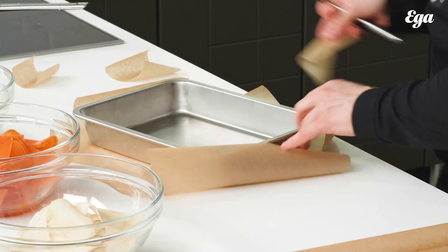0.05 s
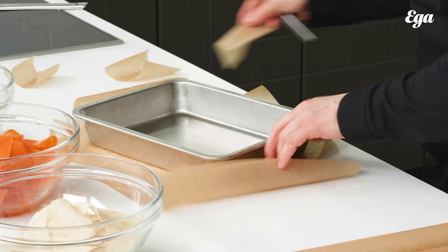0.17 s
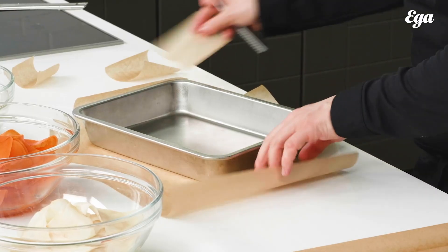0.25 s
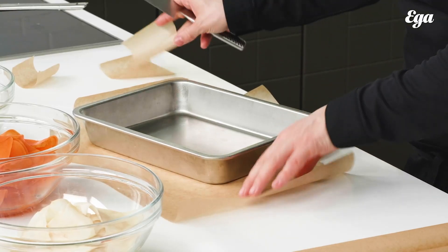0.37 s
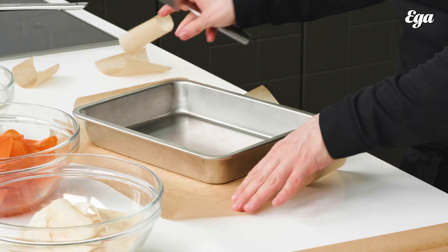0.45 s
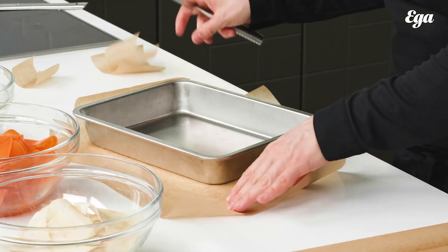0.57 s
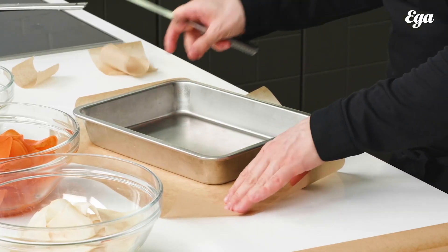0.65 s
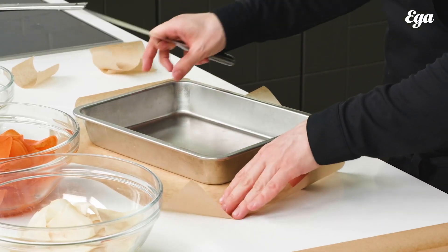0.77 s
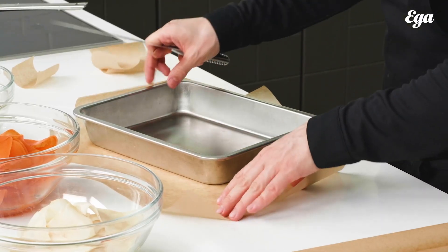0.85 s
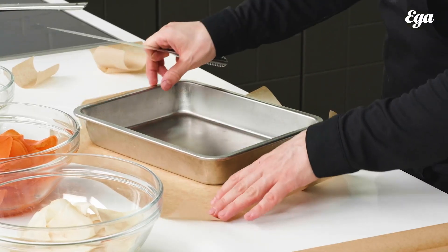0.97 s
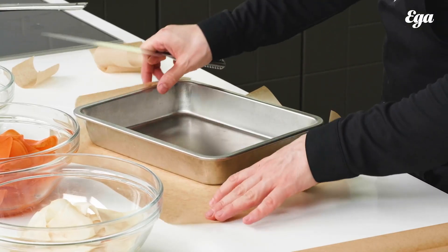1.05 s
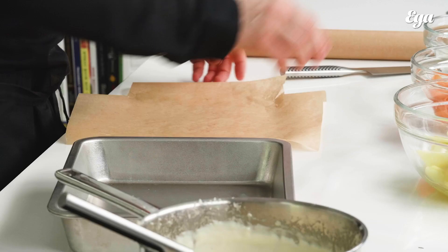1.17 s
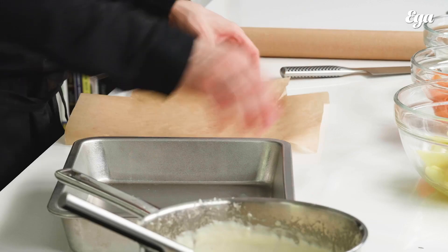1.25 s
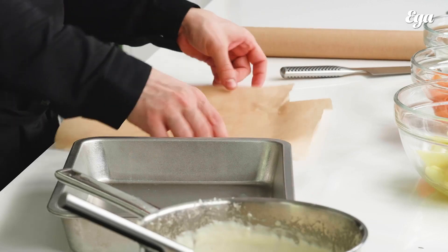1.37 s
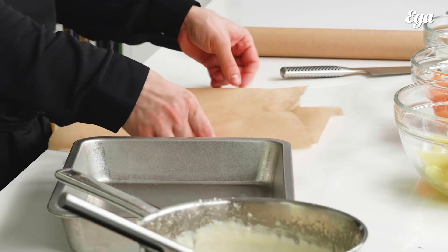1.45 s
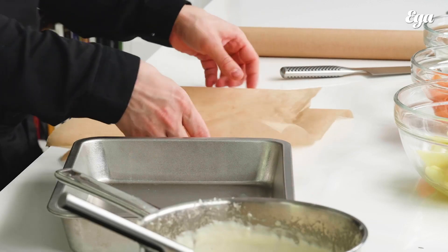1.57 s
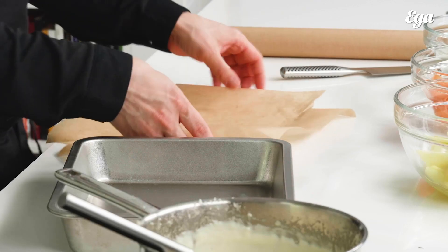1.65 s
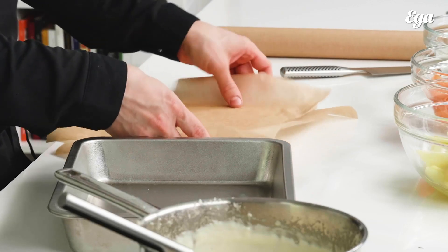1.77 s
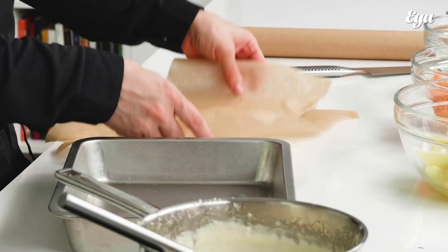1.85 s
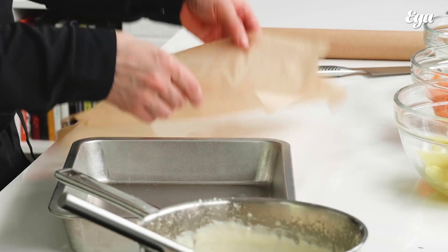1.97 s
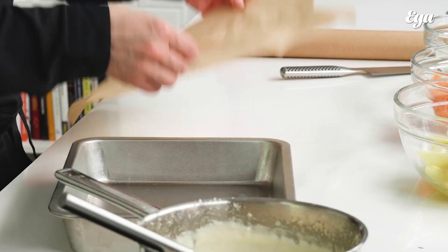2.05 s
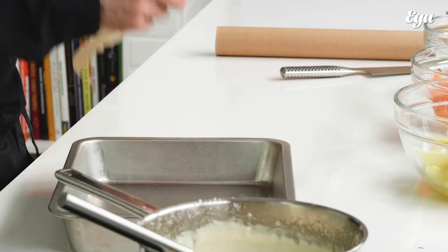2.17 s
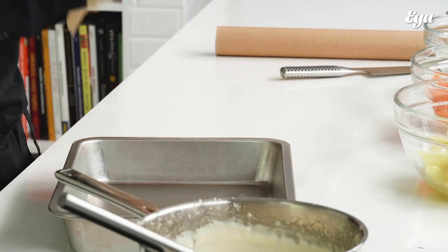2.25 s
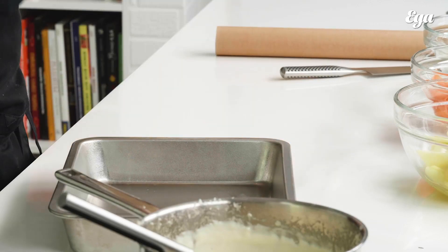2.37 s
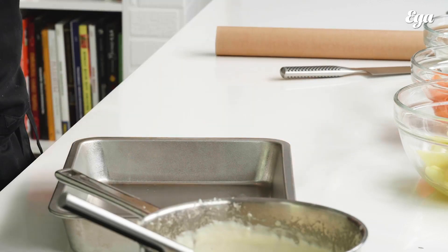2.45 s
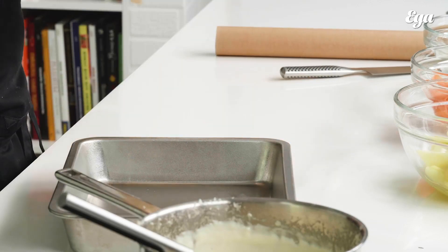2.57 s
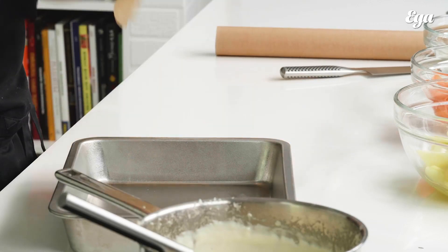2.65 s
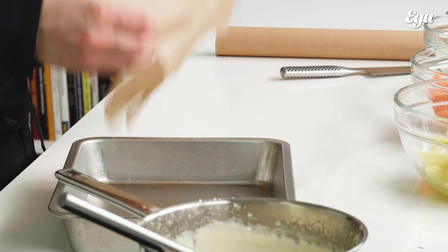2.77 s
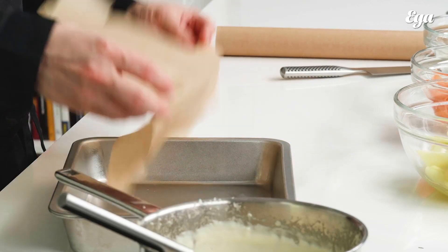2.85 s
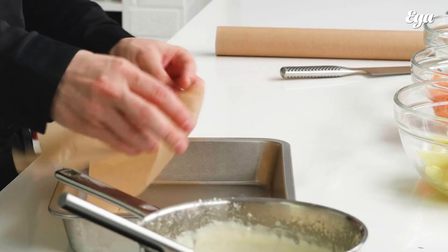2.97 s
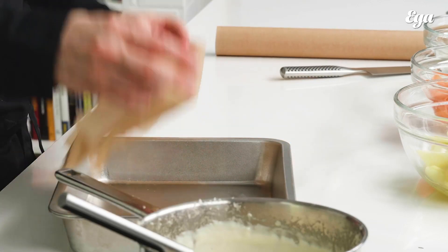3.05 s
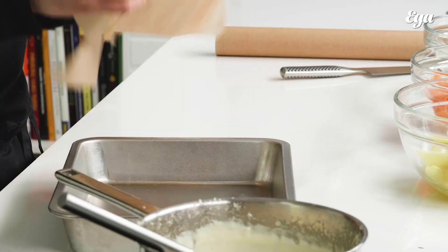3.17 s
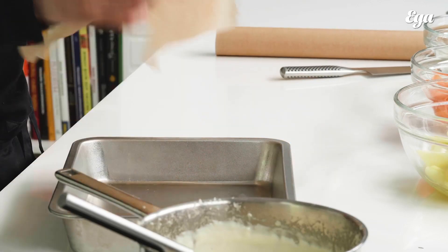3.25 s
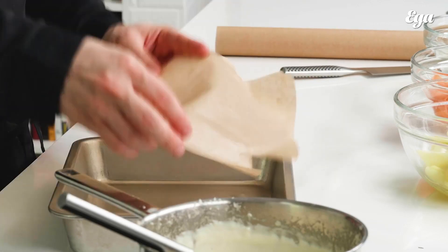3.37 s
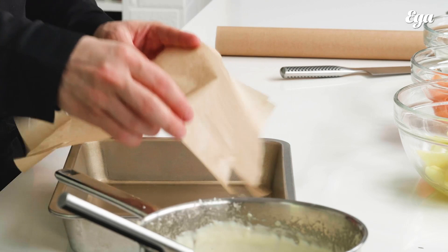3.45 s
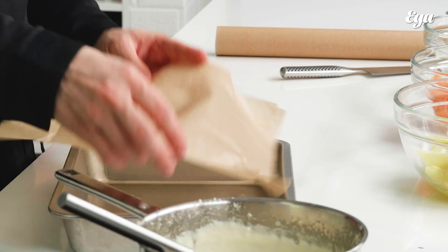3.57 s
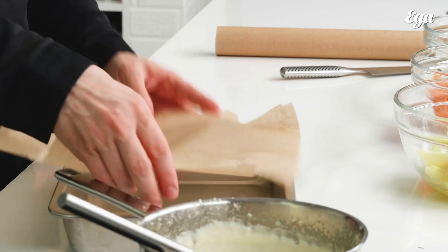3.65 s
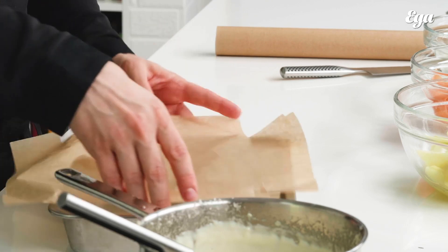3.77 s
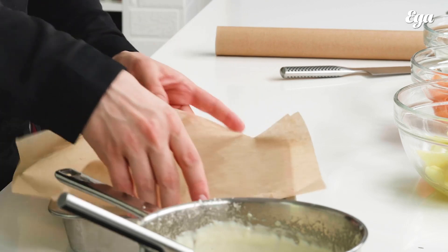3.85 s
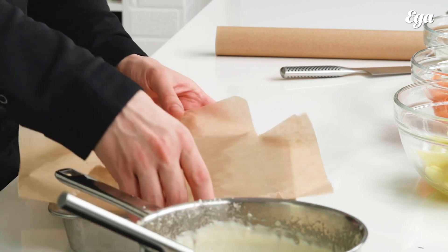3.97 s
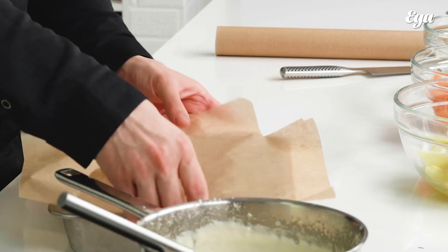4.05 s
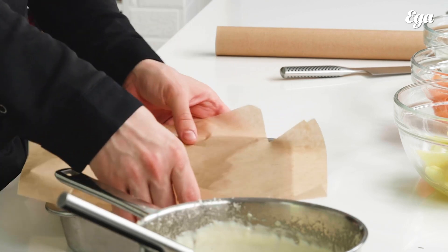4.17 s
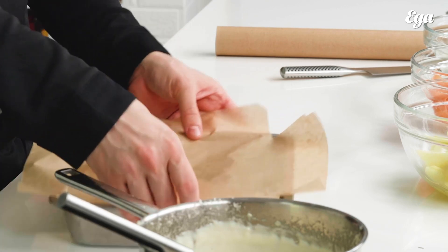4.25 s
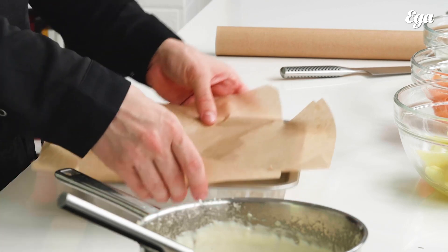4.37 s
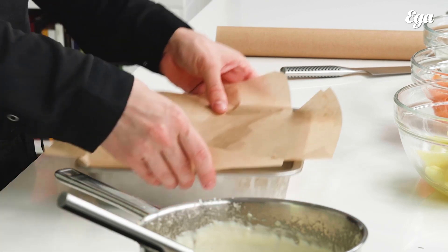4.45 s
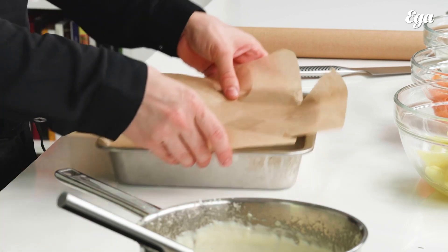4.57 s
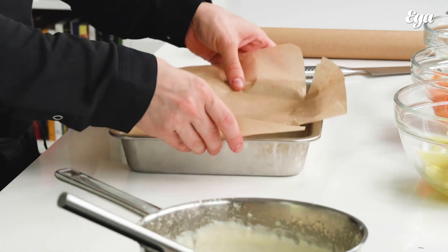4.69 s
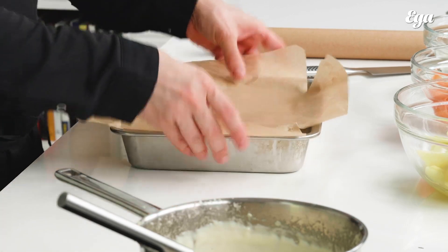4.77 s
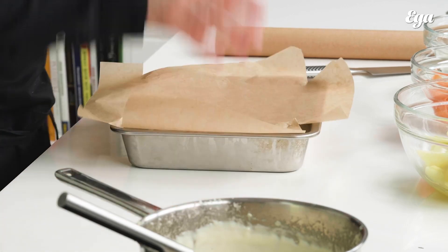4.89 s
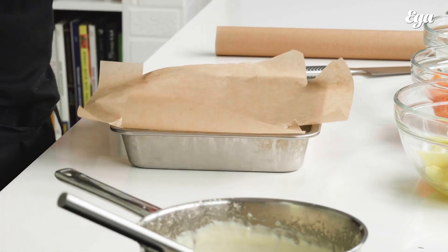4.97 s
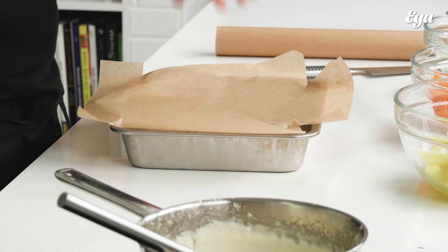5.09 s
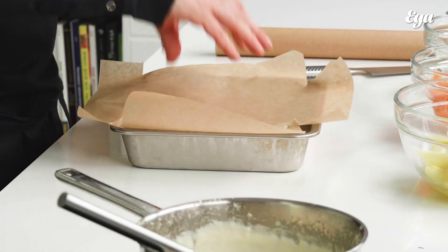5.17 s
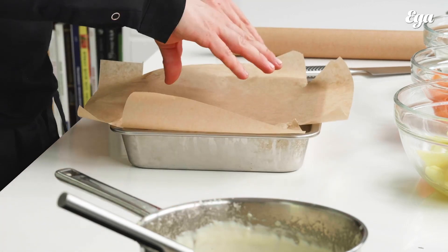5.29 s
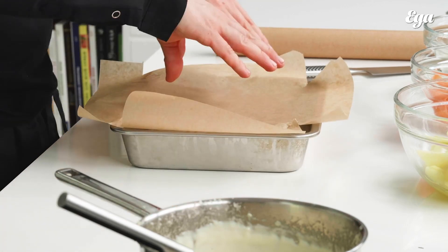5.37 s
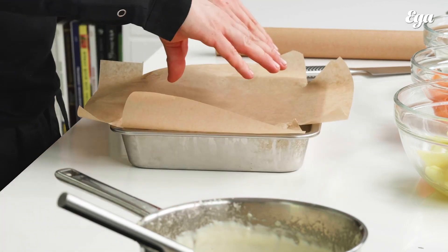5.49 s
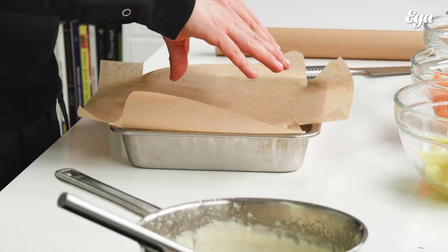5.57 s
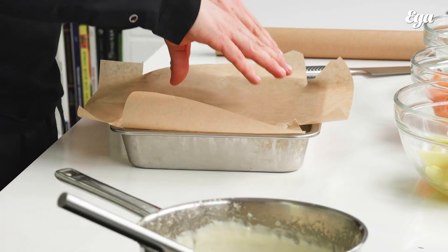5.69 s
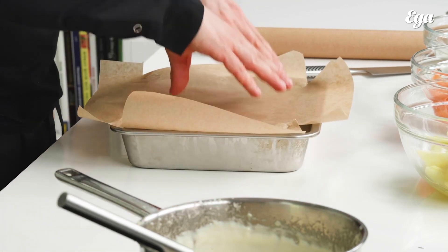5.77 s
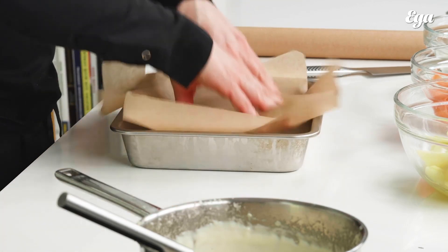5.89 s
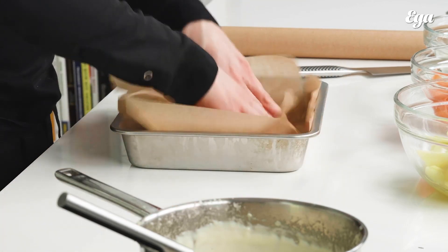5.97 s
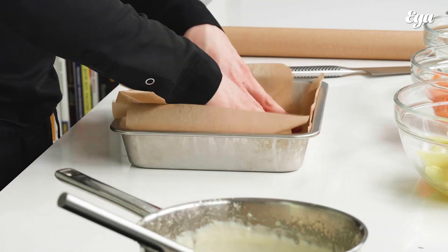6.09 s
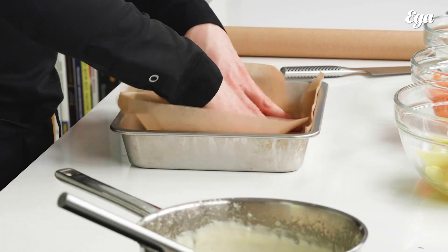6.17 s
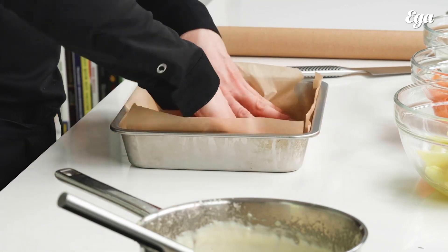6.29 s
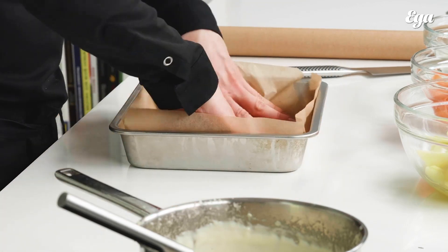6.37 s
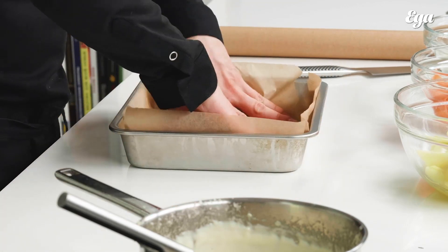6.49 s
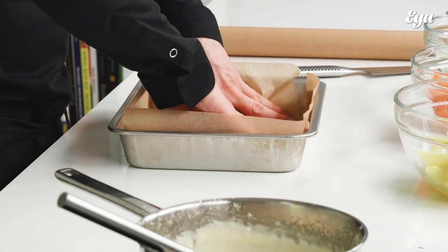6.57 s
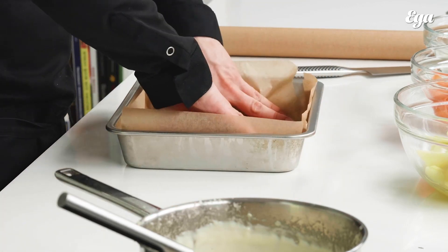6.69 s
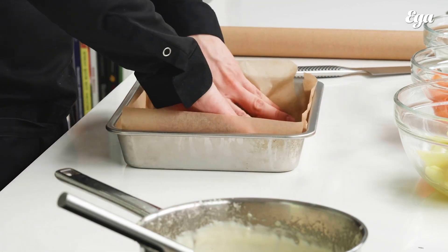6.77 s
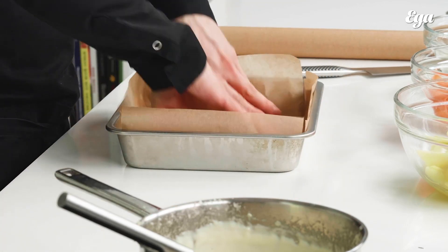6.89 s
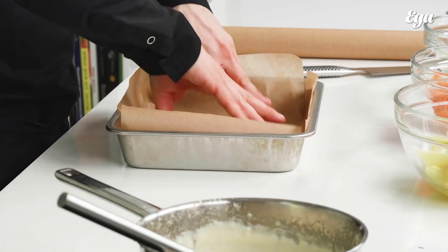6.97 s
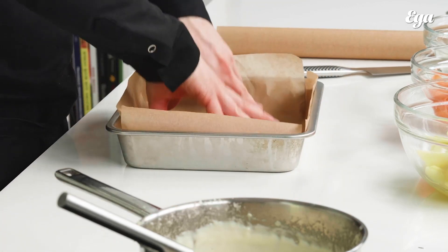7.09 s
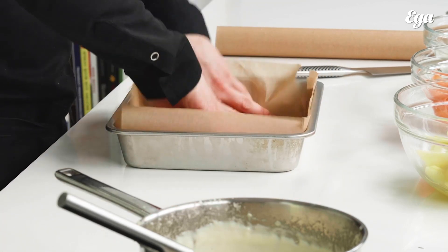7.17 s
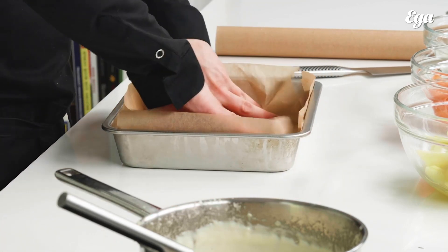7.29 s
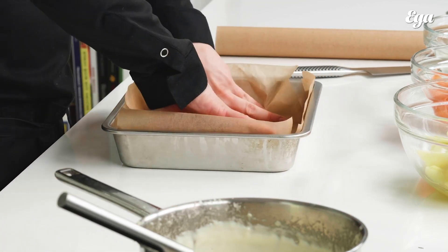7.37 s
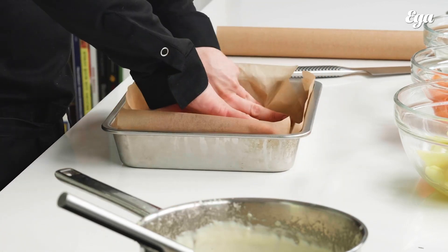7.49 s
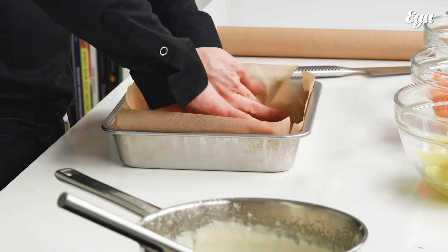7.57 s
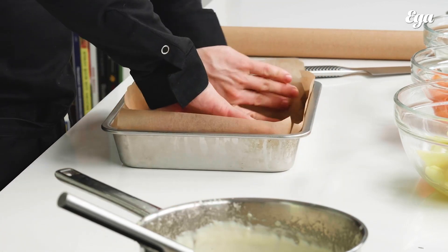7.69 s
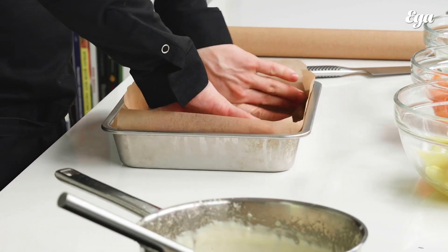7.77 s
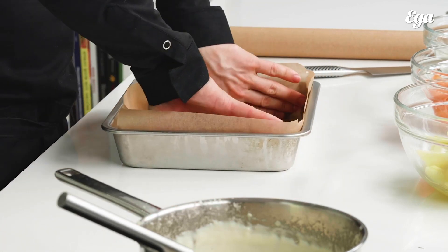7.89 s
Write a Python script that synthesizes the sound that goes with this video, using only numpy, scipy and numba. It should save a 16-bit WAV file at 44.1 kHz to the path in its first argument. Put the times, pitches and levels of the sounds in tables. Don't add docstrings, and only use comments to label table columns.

```python
import sys
import numpy as np
from scipy import signal
from scipy.fft import rfft, irfft, dct
from scipy.io import wavfile
from scipy.ndimage import uniform_filter1d
from numba import njit

SR = 44100
rng = np.random.default_rng(int(sys.argv[2]) if len(sys.argv) > 2 else 0)


def to_wav(s):
    ch = np.atleast_2d(s).T
    pcm = np.round(np.clip(ch, -1, 1) * 32767)
    wavfile.write(sys.argv[1], SR, pcm.astype(np.int16))


def makeup_ratio(level_db):
    decades = np.asarray(level_db, float) / 20
    return 10 ** decades


N = 349713


@njit
def svf(x, hz, width):
    y, b, l = np.empty(len(x)), 0., 0.
    g, k = np.tan(np.pi * hz / SR), width / hz
    for i in range(len(x)):
        v = (b + g * (x[i] - l)) / (1 + g * (g + k))
        b, l, y[i] = 2 * v - b, l + 2 * g * v, k * v
    return y


def unit(x):
    return x / np.sqrt(np.mean(x ** 2))


def shade(spectrum, hz):
    f, db = np.transpose(spectrum)
    return np.interp(np.log(hz), np.log(f), db)


def curves(table):
    s, *columns = np.transpose(table)
    return [np.interp(np.arange(N) / SR, s, c) for c in columns]


def peak_db(s, db, swell_s, fade_s, span_db):
    late_s = np.arange(N) / SR - s
    return db - span_db * np.maximum(-late_s / max(swell_s, .002), late_s / max(fade_s, .002))


def buckles(rate, spread_db):
    when, sign, size = rng.random(N), rng.standard_normal(N), rng.exponential(size=N)
    gain = makeup_ratio(np.minimum(spread_db * size, 26))
    return unit((when < rate / SR) * sign * gain)


def swarms(rate, spread_db, fade_s, calm):
    fall = np.exp(-1 / (fade_s * SR))
    power = signal.filtfilt([1], [1, -fall], buckles(rate, spread_db) ** 2, padlen=0)
    return calm + (1 - calm) * power / power.mean()


def handling():
    # t/s, effort/dB, crispness/dB
    steady = [(0.0, -64, -21), (0.35, -55.5, -5.5), (1.0, -73.5, -2.5), (1.11, -66, -9.5), (1.4, -72.5, -5),
              (1.72, -63.5, -6.5), (1.87, -44.5, -5), (2.37, -49, -11.5), (2.6, -44.5, -9),
              (3.08, -46.5, -8.5), (3.34, -44, -15), (3.6, -47, -9), (4.08, -65.5, -15), (4.14, -44, -9),
              (4.56, -51.5, -14), (5.02, -65.5, -22), (5.45, -87.5, -6.5), (5.9, -105, -4.5)]
    # start/s, peak/s, effort/dB, fade per swell/s, crispness/dB
    gestures = [(-0.01, 0.0, -44, 0.11, -7), (0.098, 0.262, -46.5, .04, -14),
                (0.31, 0.328, -41, 0.019, -4.5), (1.396, 1.438, -49, 0.39, -4),
                (2.36, 2.42, -36, 0.22, -3.5), (2.39, 2.506, -29.5, 0.048, -6),
                (3.073, 3.106, -37, 0.5, -5.5), (3.322, 3.461, -26.5, 0.035, -4),
                (3.678, 3.708, -38.5, 0.22, -10), (3.95, 4.022, -48.5, 0.11, -11.5),
                (4.534, 4.662, -39.5, .16, -9), (4.797, 4.859, -39.5, 0.12, -12),
                (5.926, 6.062, -25.5, 0.081, -4.5), (6.11, 6.325, -25, 0.15, -5),
                (6.364, 6.45, -39, 0.34, -5), (6.475, 6.565, -45.5, 0.1, 1),
                (6.74, 6.963, -48.5, 0.12, -7.5), (7.213, 7.268, -34.5, 0.22, -2),
                (7.63, 7.723, -38, 0.035, -9), (7.72, 7.744, -48.5, 1.7, -6)]
    swell_db = 21.5
    db, crisp_db = curves(steady)
    power = makeup_ratio(db) ** 2
    crisp = power * crisp_db
    for start_s, s, top_db, fade_s, edge_db in gestures:
        grip = makeup_ratio(peak_db(s, top_db, s - start_s, fade_s, swell_db)) ** 2
        grip = grip * (np.arange(N) >= start_s * SR)
        power = power + grip
        crisp = crisp + grip * edge_db
    db, crisp_db = 10 * np.log10(power), crisp / power
    belly_db = np.minimum(-8 - 0.0848 * (db + 44) + .05 * crisp_db, 1.5)
    return db, belly_db, crisp_db


def snaps():
    # t/s, peak/dB, fold ring f/Hz, edge/dB
    at_once = [(0.3177, -22.5, 2660, -34), (0.3295, -20, 3180, -26), (0.4396, -31, 4300, 1),
               (0.822, -42.5, 4300, 8.5), (1.506, -25, 3460, -6), (1.5335, -32, 3160, -17),
               (2.0558, -23, 3480, -11), (2.2593, -22.5, 1800, -2.5), (2.3805, -33, 1920, 1),
               (2.4024, -35, 2236, -10), (2.4578, -9.5, 2920, -21), (2.5322, -16, 2040, -2),
               (2.594, -36, 2750, 13.5), (2.8359, -23, 2600, -4), (3.1168, -25, 3360, 4.5),
               (3.1991, -17, 4250, -1), (4.119, -33, 4260, 1), (4.2094, -32.5, 5310, 9.5),
               (4.28, -29, 1660, -4), (4.3176, -23, 2320, 0), (4.9688, -29.5, 1970, -9.5),
               (6.2463, -12, 2410, -22), (6.6747, -20, 4780, 0), (6.7729, -22, 4100, -20),
               (6.8327, -30.5, 4680, -28), (6.9655, -29, 2710, -2), (7.1165, -38.5, 4080, -7),
               (7.452, -23.5, 2240, 3), (7.678, -22.5, 8200, 1), (7.8458, -21, 2400, -24)]
    # t/s, peak/dB, fold ring f/Hz, edge/dB
    crunching = [(0.4254, -32.5, 3930, -3.5), (1.5753, -21.5, 3440, -6), (1.82, -26.5, 1650, 1),
                 (1.8612, -25, 3830, -4), (2.1763, -28, 3430, -2), (2.4229, -15.5, 2220, 2),
                 (2.6162, -18.5, 3180, -2), (2.662, -24, 6200, 2), (2.7844, -20.5, 2130, -5),
                 (2.8727, -23.5, 4900, 1.5), (3.075, -28.5, 3060, -12), (3.2232, -19.5, 3790, -6),
                 (3.2931, -20, 2070, -4), (3.4508, -17, 2700, 3), (3.6142, -28.5, 2300, 2),
                 (3.7025, -27, 3200, -4), (4.6065, -26.5, 2860, 0), (4.6466, -19, 2420, 0),
                 (4.693, -25, 2040, -17.5), (4.8394, -26, 1620, -15.5), (6.1684, -28.5, 4740, -6),
                 (6.2818, -13, 2420, -19), (6.4188, -26, 2250, -17), (6.4536, -19, 3560, -5),
                 (6.5645, -27, 3140, -15), (6.8736, -33, 5100, -6), (7.012, -30, 4070, -3),
                 (7.3777, -26, 5800, 4), (7.7696, -27.5, 2960, -3), (7.8278, -27, 2390, -1)]
    # t/s, peak/dB, fold ring f/Hz, edge/dB
    running = [(0.703, -43, 2750, -12), (1.4276, -39, 3200, 3), (1.4439, -27.5, 3870, -14),
               (1.7838, -31, 3800, -3), (1.9751, -20.5, 4020, -10), (2.1397, -27, 3730, 0.5),
               (2.7521, -25, 2980, -6), (2.936, -19.5, 3180, -2.5), (2.9715, -20, 1960, -7.5),
               (3.246, -21, 2150, -4.5), (3.341, -36, 3610, -7), (3.3605, -20, 5300, -2.5),
               (3.3782, -20, 3860, -0.5), (3.518, -29, 2750, -14), (3.5334, -22.5, 5800, -3),
               (3.8786, -29, 5260, -12), (4.139, -28, 4190, 1.5), (4.3695, -24.5, 4280, -7),
               (5.9333, -22.5, 2610, -6), (5.953, -18, 1550, -12), (6.198, -18, 3130, -18),
               (6.5932, -19.5, 4600, 2.5), (6.757, -37.5, 3150, -9), (6.9206, -28, 3150, -6),
               (7.2494, -23.5, 6400, -18), (7.707, -18, 2250, -27)]
    power, ticks, rings = np.zeros((3, N)), np.zeros((3, N)), np.zeros(N)
    t = np.arange(2000) / SR
    for rows, ms in [(at_once, 2.3), (crunching, 4.7), (running, 10)]:
        age = t * 1000 / (0.49 * ms)
        run = (age * np.exp(1 - age)) ** 1.21
        for s, db, hz, edge_db in rows:
            i = int(s * SR)
            gain = makeup_ratio(db - 12.5 + np.array([[-16.0], [0], [edge_db]]))
            power[:, i:i + len(t)] += (gain ** 2 * run)[:, :N - i]
            tick_at = min(i + int(.5 * ms * SR / 1000), N - 1)
            ticks[:, tick_at] += gain[:, 0] * 3.1
            ring = svf(rng.standard_normal(len(t)) * np.sqrt(run), 1. * hz, 0.14 * hz)
            ring = makeup_ratio(db - 10.0) * ring / np.abs(ring).max()
            rings[i:i + len(t)] += ring[:N - i]
    return power, ticks, rings


def paper():
    # f/Hz, density/dB
    sheet = [(88, -41), (150, -10.5), (193, -12.5), (325, -7.5), (372, -13), (418, -3), (792, -1.5),
             (1290, -4.5), (2010, -2.5), (4350, -2.5), (15300, -8.5)]
    zones_hz = [700, 2500, 9000]
    db, belly_db, edge_db = handling()
    crease, ticks, out = snaps()
    swarm = swarms(rate=120, spread_db=2.1, fade_s=0.0031, calm=0.46)
    zone_db = np.array([db + belly_db + 3.5, db + 3.0, db + edge_db + 3.5])
    rustle = makeup_ratio(zone_db) ** 2 * swarm
    force = np.log(rustle + crease) / 2
    sharp = buckles(rate=1100, spread_db=2.5)
    crisp = buckles(rate=490, spread_db=2.5)
    for hz in 160 * 2 ** np.arange(0, 6.7, 1 / 3):
        share = np.array([np.interp(np.log(hz), np.log(zones_hz), row) for row in np.eye(3)])
        patch = buckles(rate=900 + 1.2 * hz, spread_db=2.5)
        patch = patch * np.sqrt(swarms(rate=90, spread_db=1.26, fade_s=.003, calm=0.68))
        common = share @ [.2, .45, .45] * sharp + share @ [.05, .25, .7] * crisp
        shaken = np.exp(share @ force) * (patch + common) + share @ ticks
        tilt_db = shade(sheet, hz) - share @ shade(sheet, zones_hz) + share @ [11.0, 4.0, 1.5]
        out = out + makeup_ratio(tilt_db) * svf(svf(shaken, hz, 0.45 * hz), hz, 0.45 * hz)
    return out


def flap():
    # t/s, level/dB, swell/s, fade/s
    puffs = [
        (0.2, -60, .3, 0.14),
        (1.43, -59, .15, 0.32),
        (1.85, -65, .3, .3),
        (2.52, -53.5, 0.55, .06),
        (2.92, -42.5, 0.11, 0.097),
        (3.0, -57, .05, 1),
        (6.07, -58.5, .1, 0.17),
        (6.29, -58, .15, 0.54),
    ]
    rumble_db, puff_span_db = -69, 20.
    air = svf(svf(rng.standard_normal(N), 55., 59.0), 41.0, 90.)
    power = makeup_ratio(rumble_db) ** 2 + sum(makeup_ratio(peak_db(*puff, puff_span_db)) ** 2 for puff in puffs)
    return unit(air) * np.sqrt(power)


def kitchen():
    # f/Hz, density/dB
    hush = [(59, -33), (100, -13), (135, -8), (174, 0), (271, -11), (608, -14), (1230, -15.5), (1520, -18),
            (4110, -25.5), (16000, -35)]
    hush_db = -75
    hz = np.maximum(np.arange(N // 2 + 1) * SR / N, 20)
    spectrum = rfft(rng.standard_normal(N)) * makeup_ratio(shade(hush, hz))
    return unit(irfft(spectrum, N)) * makeup_ratio(hush_db)


def edge_ticks():
    # t/s, peak/dB
    plain_ticks = [(0.1895, -37), (0.203, -36), (0.5769, -39), (0.63, -46), (0.7027, -44), (1.1544, -55),
                   (1.2226, -49), (1.884, -26), (2.3113, -30), (2.55, -27), (2.6382, -29), (2.6758, -25),
                   (2.7213, -28), (2.8468, -28), (3.566, -21), (3.63, -41), (3.764, -34), (3.8618, -38),
                   (3.914, -40), (4.0322, -40), (4.0801, -41), (4.1768, -28), (4.5223, -34.5), (4.858, -26),
                   (6.6692, -26), (6.7123, -36), (6.894, -29), (7.0414, -42), (7.404, -19), (7.782, -30)]
    # t/s, peak/dB, f/Hz
    corner_ticks = [(0.0074, -25, 5260), (0.042, -35, 6400), (0.486, -36, 4820), (1.093, -44.5, 7990),
                    (2.0981, -37, 5430), (2.5868, -21.5, 10900), (2.8248, -29, 4870), (3.799, -25.5, 5400),
                    (4.2487, -31, 5240), (4.5875, -34, 6200), (5.1203, -42.5, 6040), (6.2754, -18, 6030),
                    (6.9894, -40, 5430), (7.3944, -19, 4990), (7.4625, -28.5, 7320), (7.5433, -32, 5640),
                    (7.639, -38, 5090), (7.8725, -30, 5100), (7.893, -27.5, 5340), (7.9194, -28, 8000)]
    tick_hz, scatter = 4080, 0.077
    out, t = np.zeros(N), np.arange(500) / SR
    plain = [(s, db, tick_hz * (1 + scatter * rng.standard_normal())) for s, db in plain_ticks]
    for s, db, hz in plain + list(corner_ticks):
        i = int(s * SR)
        push = rng.standard_normal(len(t)) * (1 - np.exp(-t / .0004)) * np.exp(-t / 0.0012)
        tick = svf(push, 1. * hz, .5 * hz) + 0.47 * push
        tick = makeup_ratio(db) * tick / np.abs(tick).max()
        out[i:i + len(t)] += tick[:N - i]
    return out


def drags():
    # start/s, end/s, f/Hz, width/Hz, level/dB
    strokes = [(0.162, 0.267, 1260, 900, -50), (0.251, 0.292, 1600, 200, -47), (.91, 1.08, 4040, 90, -72),
               (0.713, 0.767, 4220, 2520, -55), (0.993, 1.214, 1570, 1300, -64),
               (2.445, 2.546, 2040, 910, -31.5), (3.426, 3.482, 830, 599, -38.5),
               (4.11, 4.24, 880, 300, -48.5), (4.433, 4.57, 2690, 120, -59), (4.69, 4.767, 695, 402, -49),
               (7.077, 7.236, 2600, 3500, -73), (7.22, 7.457, 5000, 2000, -43.5),
               (7.708, 7.718, 560, 249, -45)]
    out = np.zeros(N)
    slips = buckles(rate=4800, spread_db=1.0)
    for start_s, end_s, hz, width_hz, db in strokes:
        i, j = int(start_s * SR), int(end_s * SR)
        hum = svf(svf(slips[i:j], 1. * hz, 1. * width_hz), 1. * hz, 1. * width_hz)
        out[i:j] += makeup_ratio(db) * unit(hum) * np.hanning(j - i) ** 0.31
    return out


def knocks():
    # t/s, peak/dB, f/Hz
    thuds = [
        (1.151, -54, 806),
        (1.274, -49.5, 660),
        (1.418, -45.5, 167),
        (2.254, -37, 520),
        (4.535, -35.5, 580),
        (5.119, -55.5, 650),
    ]
    out, t = np.zeros(N), np.arange(4000) / SR
    for s, db, hz in thuds:
        i = int(s * SR)
        puff = unit(svf(rng.standard_normal(len(t)), 0.34 * hz, 0.54 * hz))
        ring = np.sin(2 * np.pi * hz * t) * np.exp(-t / 0.0053)
        out[i:i + len(t)] += makeup_ratio(db) * (1.2 * ring + 0.43 * puff * np.exp(-t / 0.017))
    return out


@njit
def walls(x, lags, gain, damp):
    line, soft, out = np.zeros((8, 4096)), np.zeros(8), np.zeros(len(x))
    for i in range(len(x)):
        total = 0.
        for k in range(8):
            soft[k] += (1 - damp) * (gain[k] * line[k, (i - lags[k]) & 4095] - soft[k])
            total += soft[k]
            out[i] += soft[k] * (1 - 2 * (k % 2))
        for k in range(8):
            line[k, i & 4095] = x[i] + soft[k] - total / 4
    return out


def scene():
    t60_s, damp, echo_db = 0.55, 0.67, -18
    near = paper() + edge_ticks() + drags() + knocks()
    lags = rng.integers(500, 2600, 8)
    echo = walls(near + 1e-18, lags, makeup_ratio(-60 * lags / SR / t60_s), damp)
    mono = near + makeup_ratio(echo_db) * echo + flap() + kitchen()
    return np.array([mono, mono])


def refill(mono):
    # f/Hz, share/0-1
    hit_share = [(3900, 0), (4600, .07), (5500, .1), (7000, .17), (9600, .3), (15300, .4), (15900, 0)]
    lead = 2048 - 973
    window = signal.windows.kaiser_bessel_derived(2048, 4 * np.pi)
    padded = np.pad(mono, (lead, 2048))
    tiles = signal.stft(padded, window=window, nperseg=2048, noverlap=1024)[2][:1024]
    power = (np.abs(tiles) ** 2).reshape(32, 32, -1).mean(axis=1) * window.sum() ** 2 / 1024
    luck = uniform_filter1d(rng.standard_normal(power.shape), size=3, axis=1)
    luck = luck + 2 * uniform_filter1d(luck, size=9, axis=0)
    rank = luck.argsort(axis=1).argsort(axis=1) / luck.shape[1]
    band_hz = (np.arange(32) + .5) * SR / 64
    hit = rank < np.interp(band_hz, *np.transpose(hit_share))[:, None]
    noise = np.repeat(hit * np.sqrt(power), 32, axis=0) * rng.standard_normal(tiles.shape)
    a, b = np.split(dct(noise, type=4, norm="ortho", axis=0), 2)
    blocks = np.concatenate([b, -b[::-1], -a[::-1], -a]) * window[:, None]
    return (blocks[:1024, 1:] + blocks[1024:, :-1]).T.ravel()[lead:lead + N]


def roll_off(x):
    return signal.sosfilt(signal.butter(12, 17060, fs=SR, output="sos"), x)


def record(dry):
    top_hz, side_db = 15850, -4.5
    low_pass = signal.ellip(10, .2, 60, top_hz, fs=SR, output="sos")
    mono = signal.sosfilt(low_pass, dry[0])
    side = makeup_ratio(side_db) * refill(mono) * np.array([[1], [-1]])
    return roll_off(mono + side)


dry = scene()
out = record(dry)
to_wav(out)
```